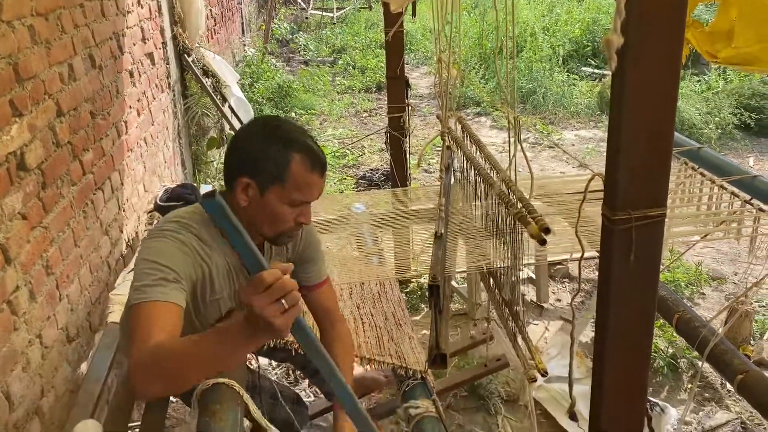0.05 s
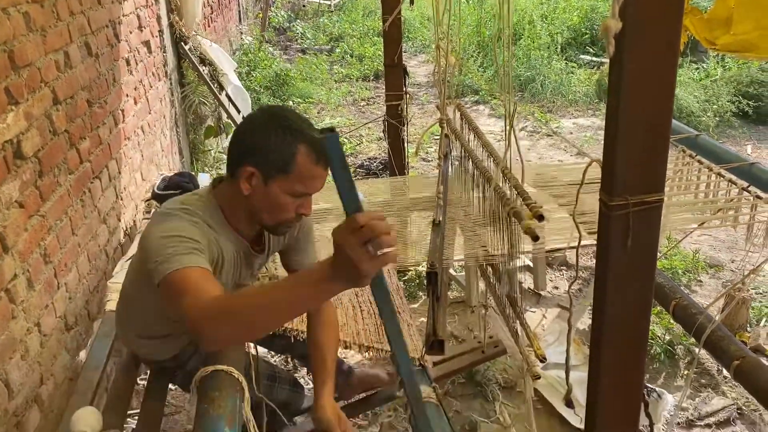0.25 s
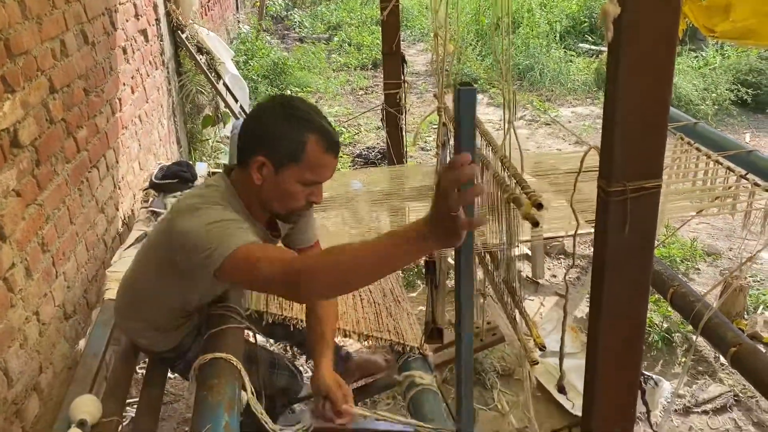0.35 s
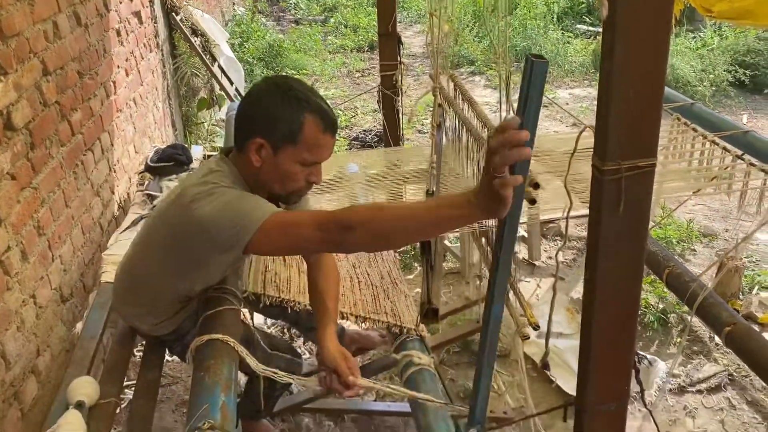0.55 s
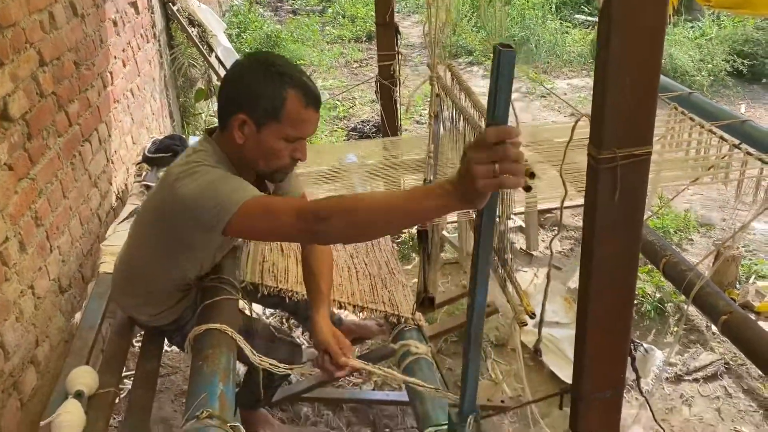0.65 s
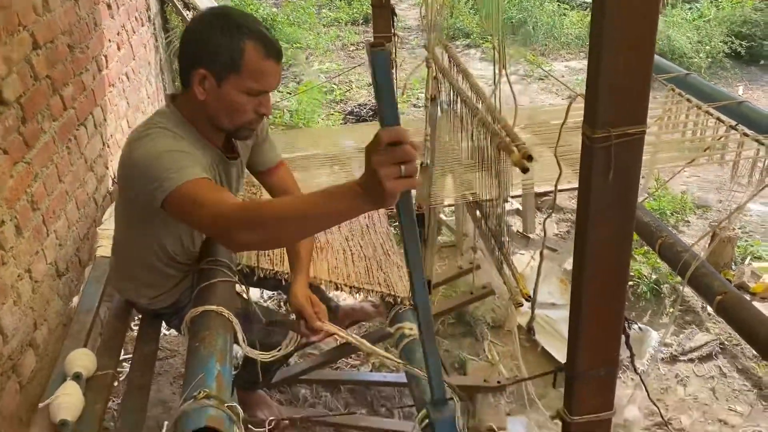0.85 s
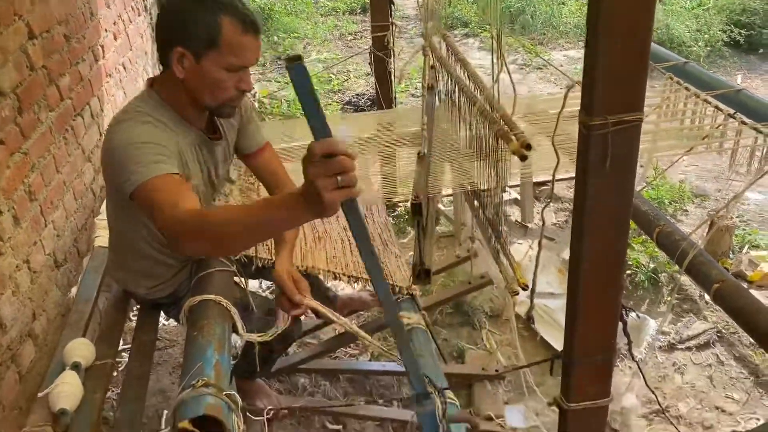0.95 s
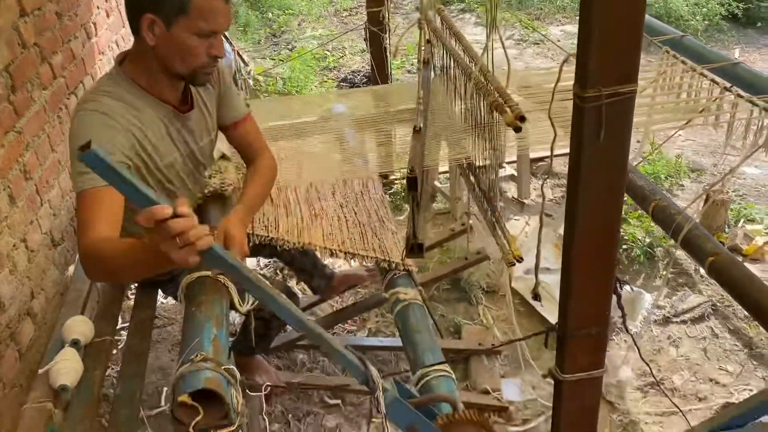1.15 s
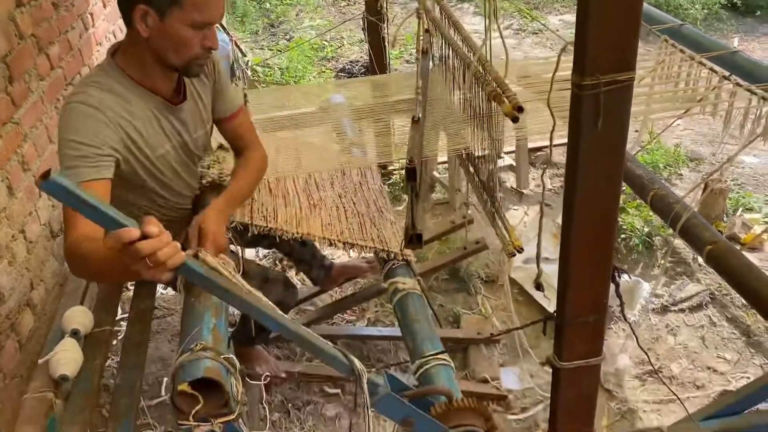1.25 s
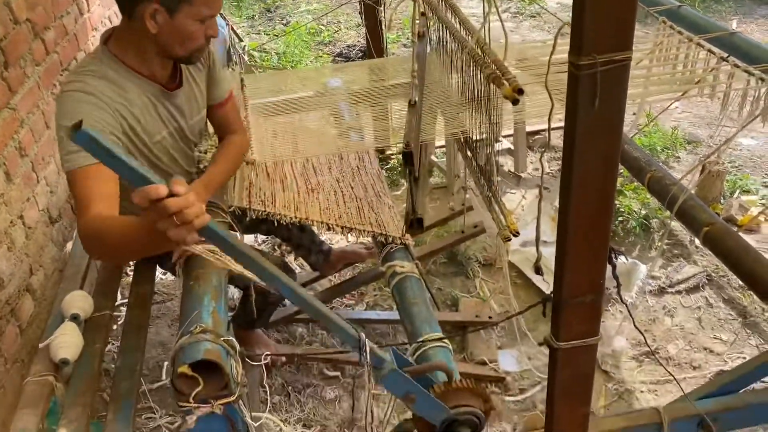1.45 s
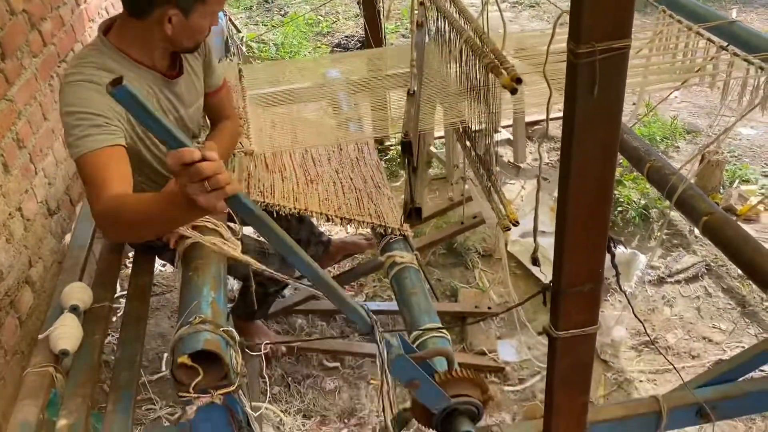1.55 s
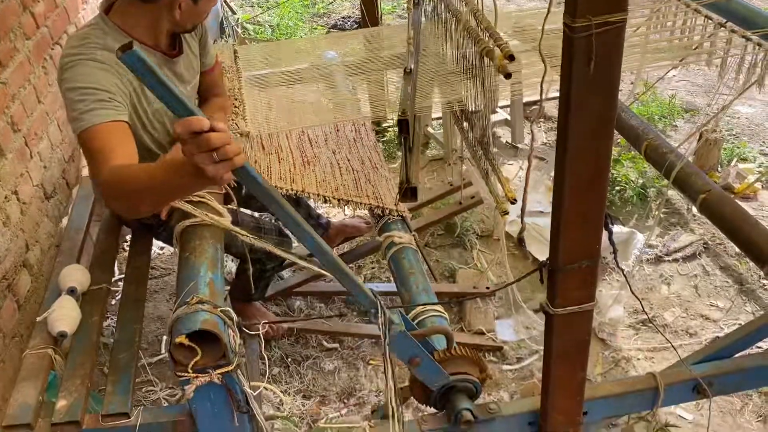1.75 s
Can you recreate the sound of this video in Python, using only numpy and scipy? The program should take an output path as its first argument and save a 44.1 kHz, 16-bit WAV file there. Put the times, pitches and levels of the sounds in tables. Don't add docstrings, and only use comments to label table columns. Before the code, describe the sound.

Metal lever clanking on a loom's ratchet roller, close and outdoors. After faint ticks, seven bright, ringing tube knocks bounce from 0.2 to 0.52 s, quickening, then are damped by hand at 0.56. A loud crunching clatter seats it at 0.78-0.92 with timber rumble. Sharp pawl clacks follow at 1.02, 1.11 and 1.24, a hard clank at 1.44, then small knocks, a tiny squeak and quiet yard air.

```python
import sys
import numpy as np
from scipy import signal
from scipy.fft import rfft, irfft, next_fast_len
from scipy.io import wavfile

SR = 44100
rng = np.random.default_rng(int(sys.argv[2]) if len(sys.argv) > 2 else 0)


def int16_out(signal):
    q = np.round(np.clip(np.atleast_2d(signal).T, -1, 1) * 32767)
    wavfile.write(sys.argv[1], SR, q.astype(np.int16))


def level_to_linear(level):
    exponent = np.asarray(level, float) / 20
    return 10 ** exponent


N = 79380

# frequency [Hz], level [dB per Hz].
AIR_SPECTRUM = [(15, -43), (25, 0.5), (60, -3.5), (251, -17), (329, -5.5), (387, -19), (2020, -21),
                (16300, -43.5)]
AIR_DB, AIR_FADE_DB_PER_S = -28.5, 2.4
# frequency [Hz], width [Hz], level [dB], change [dB per s].
DRONES = [(316, 27, -57.5, -10), (1217.5, 46, -59, -3), (61.4, 15, -61.5, 5)]
# delay [s], left level [dB], right level [dB].
ECHOES = [
    (.004, -38.5, -37.5),
    (.0071, -10.5, -6.5),
]

SQUEAK_S, SQUEAK_LENGTH_S, SQUEAK_HZ, SQUEAK_RISE_HZ = 1.545, 0.1, 5430, 130
SQUEAK_DB, SQUEAK_OCTAVE_DB, SQUEAK_RIGHT = -53, -51, -0.4

# time [s], level [dB].
STRAIN = [(.78, -74), (.82, -31.5), (.94, -38.5), (1.0, -45), (1.27, -50), (1.36, -45), (1.44, -47.5),
          (1.489, -32), (1.57, -47), (1.64, -54)]
# frequency [Hz], level [dB per Hz].
FRAME_SPECTRUM = [(30, -27), (70, 0), (250, -12), (500, -13), (1500, -9.5), (8000, -43)]
# frequency [Hz], width [Hz], level [dB].
FRAME_MODES = [(75.8, 12, 16), (135, 16, 6), (204, 14, -20), (246.6, 11, 21), (485, 31, 10)]
CREAKS_PER_S, CREAK_DB, FRAME_BODY_DB = 130, -13.5, -13
# start [s], frequency [Hz], level [dB], t60 [s].
THUMPS = [(.812, 129, -30, 0.19), (.84, 205, -31, 0.18), (0.849, 72.5, -30, 0.14), (.9, 80, -31, 0.26),
          (.905, 147, -38.5, 0.31), (.912, 263, -32.5, 0.24), (1.024, 257, -35, 0.14),
          (1.113, 273, -35.5, 0.17), (1.12, 148, -42, 0.27), (1.158, 63.5, -38, 0.16),
          (1.225, 65.6, -40, 0.33), (1.239, 256.5, -39.5, 0.28), (1.431, 113, -32, 0.15),
          (1.476, 203, -34, 0.21), (1.499, 89.6, -41, .25), (1.48, 506, -42.5, 0.25),
          (1.671, 59.9, -37, 0.3)]
THUMP_RISE_CYCLES, THUMP_FLICKER_DB = 1.83, 3.0

# frequency [Hz], level [dB], t60 [s].
SLAT = [(2030, 0, .04), (970, -5, .09)]
TICK_S, TICK_DB = 0.0395, -42

# start [s], peak [dB], brightness [dB per octave], ring length [factor], crack [dB].
CLACKS = [(0.101, -44.5, 6.5, 2.7, 1), (.709, -48.5, 6, .8, -4), (0.776, -15.5, -6.5, 1.2, -4),
          (0.785, -14.5, -3.5, 0.77, 1.5), (0.788, -6.5, 4.5, 0.75, -5), (0.7949, -10.5, -3, 0.5, 7),
          (0.806, -9.5, 1, 0.9, -1), (.822, -16, -5.5, 1.6, -9), (0.839, -13, -2.5, 1.8, -3),
          (0.867, -15, -1, 0.8, -1), (0.901, -9, -5, 0.77, -2), (0.912, -10.5, -3, 0.8, -8),
          (1.022, -6.5, 1.74, 1.05, 4.5), (1.112, -6, -0.5, 1.06, 0.5), (1.237, -8, -0.63, 1.07, -2),
          (1.382, -24.5, -4.5, 1.1, 4), (1.42, -25.5, -2.5, 0.53, -4), (1.444, -5.5, 0.76, 0.74, 2.5),
          (1.523, -22, -4, 1.2, -7), (1.573, -31.5, 0.5, 1, 0), (1.6, -44.5, 6, 1.5, -1)]
# frequency [Hz], level [dB per Hz].
CLACK_SPECTRUM = [(90, -33), (300, -16.5), (1500, -7.5), (4490, -10), (7600, -14), (10600, -25.5),
                  (15100, -25.5), (16500, -26)]
# frequency [Hz], t60 [s].
CLACK_T60 = [(200, 0.27), (1000, 0.25), (4000, 0.16), (10000, 0.1), (16000, 0.06)]
CRACK_DB, CRACK_T60_S = 1, 0.017
BODY_T60_S, BODY_DB = 0.031, -3.5

# start [s], peak [dB], brightness [dB per octave], spring [dB].
TEETH = [
    (1.024, -18.5, 1, -17.5),
    (1.113, -20, 1.6, -13.5),
    (1.24, -21.5, 1.8, -38),
]
PAWL_HZ = [878, 1356, 1682, 2185, 2575, 3750, 4372, 5700, 6570, 7345, 14350, 14800]
# level [dB], t60 [s].
PAWL = [(-15.5, 0.22), (-21, 0.52), (-1, 0.054), (-1.5, 0.038), (-20, 0.53), (-14.5, 0.22), (-6, 0.12),
        (-19.5, 0.17), (-38, 0.083), (-35, 0.042), (-25, 0.11), (-14, 0.096)]
# frequency [Hz], level [dB], t60 [s].
SPRING = [(10860, 2, .14), (11300, -15, .07), (8830, 1, .15)]

# start [s], frequency [Hz], level [dB].
PINGS = [
    (.804, 5400, -22),
    (.912, 5100, -27),
    (.841, 4500, -29),
    (.841, 3600, -30),
    (.913, 7200, -31),
    (.868, 4600, -32),
]
PING_T60_S = 0.051

# start [s], peak [dB], high ring [dB], rattle [dB].
KNOCKS = [
    (0.2007, -13, -3.5, -4.5),
    (0.277, -11.5, -1.5, -3),
    (0.3452, -16, -6.5, -8),
    (0.407, -11.5, -3, -3.5),
    (0.4616, -14.5, -4, -6.5),
    (0.4985, -18.5, -5.5, -9),
    (0.5158, -15.5, -10.5, -11),
]
# frequency [Hz], level [dB per Hz].
KNOCK_SPECTRUM = [(120, -22.5), (350, -13.5), (1140, -8.5), (4000, -9.5), (6600, -13), (8800, -52),
                  (11000, -22), (16500, -48)]
TUBE_LOW_HZ = [665, 1149, 1218, 1268, 1296, 1545, 1733, 1790, 2592]
# level [dB], t60 [s].
TUBE_LOW = [(-21.5, 0.11), (-10, 0.19), (-22.5, 0.37), (-19.5, 0.56), (-17.5, 0.67), (-25.5, 0.43),
            (-22.5, 0.27), (-13, 0.056), (-28.5, 0.34)]
TUBE_HIGH_HZ = [4210, 5340, 7117, 9892, 10225, 11103, 12202, 14383]
# level [dB], t60 [s].
TUBE_HIGH = [(-21, 0.11), (-23.5, .2), (-2, 0.38), (-28.5, 0.26), (-24, 0.079), (-22.5, 0.18),
             (-18.5, 0.19), (-31, 0.272)]
STRONG_WALL_HZ, SHAKE_DB = 7117, 1.5
GRIP_S, GRIP_DB_PER_S = 0.556, 452
LINGER_DB, WALL_LINGER_DB, LINGER_DB_PER_S = 1, -22, 146
# start [s], peak [dB].
HELD = [
    (0.1782, -44),
    (1.4054, -37),
    (1.5248, -26),
    (1.5726, -25.5),
]
# frequency [Hz], level [dB], t60 [s].
HELD_LOW = [(1150, -9, 0.09), (1228, -15, 0.15), (1248, -8, 0.5), (1307, -12, 0.12), (1385, -20, .1),
            (1715, -18, .08), (5480, -30, .3)]
# start [s], peak [dB].
SEATS = [
    (0.7904, -14),
    (0.8031, -14.5),
    (0.8183, -23),
]
# frequency [Hz], level [dB], t60 [s].
SEATED = [(876, -14, 0.37), (1168, -5, .08), (1235, -6.5, 0.22), (1295, -7.5, 0.093), (1590, -11.5, 0.068),
          (1750, -11.5, 0.066), (1966, -11, 0.064), (2536, -16, 0.13), (4160, -21, 0.046),
          (7130, -5, 0.038)]
# frequency [Hz], level [dB], t60 [s].
STOP = [(883, -2, 0.081), (1003, -5, 0.12), (1660, -3, 0.12), (1826, -1.5, 0.055), (2500, -27, 0.089),
        (3450, -2.5, 0.059), (7330, 3, 0.03)]
STOP_S, STOP_DB = 1.4437, -24

# frequency [Hz], left-right likeness [0 to 1].
LIKENESS = [(60, 0.92), (250, 0.91), (700, 0.44), (2500, 0.53), (5000, 0.54), (8000, 0.57)]
# frequency [Hz], lag of the left [half turns].
LAG = [(20, 0), (7400, .06), (8500, .97), (9500, 1.03), (10500, 1.95), (11700, 2.05), (12700, 2.96),
       (13700, 3.04), (14600, 3.95), (15200, 4.05), (16500, 4.9)]
LEFT_DB, CUTOFF_HZ = 0.4, 16600
ALIKE_ABOVE_HZ, TOP_HZ, TOP_DB = 7900, 15300, -3


def rms_one(x):
    return x / np.sqrt(np.mean(x ** 2) + 1e-20)


def at_hz(points, hz):
    table_hz, value = np.transpose(points)
    return np.interp(np.log(hz), np.log(table_hz), value)


def drift(rate):
    r = np.exp(-80 * np.pi * rate / SR)
    slow = signal.lfilter([1], [1, -2 * r, r * r], rng.standard_normal(N // 40 + 2002))[2000:]
    return np.interp(np.arange(N) / 40, np.arange(len(slow)), rms_one(slow))


def band_pass(x, low_hz, high_hz):
    return signal.sosfilt(signal.butter(2, [low_hz, high_hz], "band", fs=SR, output="sos"), x)


def resonance(x, hz, width_hz):
    r = np.exp(-np.pi * width_hz / SR)
    poles = [1, -2 * r * np.cos(2 * np.pi * hz / SR), r * r]
    return signal.lfilter([(1 - r * r) / 2, 0, (r * r - 1) / 2], poles, x)


def bands():
    edges = 27 * 2 ** (np.arange(29) / 3)
    white = rng.standard_normal((2, 2, N))
    for k, (low, high) in enumerate(zip(edges, edges[1:])):
        mid, side = band_pass(white[k % 2], low, high)
        hz = np.sqrt(low * high)
        alike = np.clip(at_hz(LIKENESS, hz), 0, 1)
        yield hz, np.sqrt(1 + alike) * mid + np.sqrt(1 - alike) * side * [[1], [-1]]


def dying(s, db, t60, rise_s):
    s, db, t60 = (np.reshape(v, (-1, 1)) for v in (s, db, t60))
    age = np.clip(np.arange(N) / SR - s, 0, None)
    power = np.exp((db - 60 * age / t60) * np.log(10) / 10, dtype=np.float32)
    return np.sum(power * np.clip(age / rise_s, 0, 1) ** 2, axis=0)


def struck(s, db, modes, spread_db, stop_s, tilt_db=0):
    hz, level_db, t60 = np.transpose(modes)[:, :, None]
    out = np.zeros(N)
    luck = rng.standard_normal((len(s), 2, len(modes), 1))
    tilts = tilt_db + 0 * np.array(s)
    for start, end, peak_db, tilt, (strength, phase) in zip(s, [*s[1:], 9], db, tilts, luck):
        i = int(start * SR)
        length = min(N - i, SR // 2, int((end - start + 8 * stop_s) * SR))
        t = np.arange(length) / SR
        mode_db = peak_db + level_db + tilt * np.log2(hz / 3000) + spread_db * strength
        ring = level_to_linear(mode_db - 60 * t / t60) * np.sin(2 * np.pi * hz * t + phase)
        onset = 1 - np.exp(-t / 0.00026)
        stilled = np.exp(-np.clip(t - end + start, 0, None) / stop_s)
        out[i:i + length] += ring.sum(axis=0) * onset * stilled
    return out


def open_air(hz, noise, gust):
    level_db = AIR_DB - AIR_FADE_DB_PER_S * np.arange(N) / SR + at_hz(AIR_SPECTRUM, hz)
    return noise * level_to_linear(level_db + 0.54 * gust + 0.48 * drift(13))


def yard():
    t, out = np.arange(N) / SR, 0
    for hz, width_hz, db, slope_db in DRONES:
        gain = level_to_linear(db + slope_db * t + 0.55 * drift(3.7))
        tone = resonance(rng.standard_normal(N), hz, width_hz)
        out = out + gain * rms_one(resonance(tone, hz, width_hz))
    return out


def shed(x):
    thin, out = band_pass(x, 400, 4000), 0
    for k, (s, left_db, right_db) in enumerate(ECHOES):
        late = np.pad(thin, (int(s * SR), 0))[:N]
        out = out + level_to_linear([[left_db], [right_db]]) * [[1], [(-1) ** k]] * late
    return out


def squeak():
    u = np.clip((np.arange(N) / SR - SQUEAK_S) / SQUEAK_LENGTH_S, 0, 1)
    hz = SQUEAK_HZ + SQUEAK_RISE_HZ * np.sqrt(u) + 40 * drift(150)
    phase = 2 * np.pi * np.cumsum(hz) / SR
    swell = np.sin(np.pi * u) * level_to_linear(3 * drift(80))
    tone = level_to_linear(SQUEAK_DB) * np.sin(phase) * [[1], [SQUEAK_RIGHT]]
    octave = level_to_linear(SQUEAK_OCTAVE_DB) * swell * np.sin(2 * phase)
    return swell * (tone + octave)


def strain():
    s, db = np.transpose(STRAIN)
    return level_to_linear(np.interp(np.arange(N) / SR, s, db, left=-99))


def frame():
    slips = (rng.random(N) < CREAKS_PER_S / SR) * level_to_linear(np.minimum(rng.exponential(1, N), 4))
    slips = slips * rng.choice([-1, 1], N)
    drive = rms_one(slips) + 0.34 * rng.standard_normal(N)
    timber = sum(level_to_linear(db) * resonance(drive, hz, w) * np.sqrt(100 / w) for hz, w, db in FRAME_MODES)
    grain = band_pass(drive, 500, 4000)
    return strain() * (level_to_linear(FRAME_BODY_DB) * rms_one(timber) + level_to_linear(CREAK_DB) * rms_one(grain))


def thumps():
    s, hz, db, t60 = np.transpose(THUMPS)[:, :, None]
    t = np.clip(np.arange(N) / SR - s, 0, None)
    flicker_db = THUMP_FLICKER_DB * np.array([drift(16) for _ in THUMPS])
    swell = 1 - np.exp(-t * hz / THUMP_RISE_CYCLES)
    beams = level_to_linear(db + 2.0 - 60 * t / t60 + flicker_db) * swell * np.sin(2 * np.pi * hz * t)
    return np.sum(beams, axis=0)


def slat():
    return struck([TICK_S], [TICK_DB], SLAT, spread_db=0, stop_s=1)


def grip(linger_db=LINGER_DB):
    t = np.clip(np.arange(N) / SR - GRIP_S, 0, None)
    return np.maximum(level_to_linear(-GRIP_DB_PER_S * t), level_to_linear(linger_db - LINGER_DB_PER_S * t))


def roller_body(x):
    t = np.arange(SR // 10) / SR
    ring = rng.standard_normal(len(t)) * level_to_linear(-60 * t / BODY_T60_S)
    ring = level_to_linear(BODY_DB) * ring / np.sqrt(np.sum(ring ** 2))
    ring[0] = 1
    ring = ring / np.sqrt(np.sum(ring ** 2))
    return signal.fftconvolve(x, ring[None], axes=1)[:, :N]


def contact_power(hz):
    s, db, tilt_db, length, crack_db = np.transpose(CLACKS)
    knock_s, knock_db, _, rattle_db = np.transpose(KNOCKS)
    t60 = at_hz(CLACK_T60, hz)
    clack_db = db + at_hz(CLACK_SPECTRUM, hz) + tilt_db * np.log2(hz / 2000)
    clack = dying(s, clack_db - 2.5, t60 * np.clip(length, 0.1, 4), rise_s=0.0029 + 4.5 / hz)
    crack = dying(s, clack_db + CRACK_DB + crack_db, CRACK_T60_S + 0 * s, rise_s=0.0016)
    socket_db = knock_db + rattle_db + at_hz(KNOCK_SPECTRUM, hz)
    rattle = dying(knock_s, socket_db, 1.63 * t60 + 0 * knock_s, rise_s=0.00029 + 2.2 / hz)
    return clack + crack + rattle * grip() ** 2


def dense():
    near, air, pull, gust = 0, 0, strain(), drift(12.7)
    chatter = level_to_linear(2.8 * drift(100))
    for hz, noise in bands():
        contact = contact_power(hz) * chatter * level_to_linear(2.7 * drift(36))
        rumble = (pull * level_to_linear(15 + at_hz(FRAME_SPECTRUM, hz) + 2.8 * drift(26))) ** 2
        near = near + np.sqrt(contact + rumble) * noise
        air = air + open_air(hz, noise[:, ::-1], gust)
    return roller_body(near) + air


def pawl():
    s, db, tilt_db, spring_db = np.transpose(TEETH)
    modes = np.column_stack([PAWL_HZ, PAWL])
    teeth = struck(s, db - 2.0, modes, spread_db=-1.5, stop_s=0.003, tilt_db=tilt_db)
    return teeth + struck(s, db + spring_db, SPRING, spread_db=0, stop_s=0.003)


def pings():
    return sum(struck([s], [db], [(hz, 0, PING_T60_S)], spread_db=-1.5, stop_s=1) for s, hz, db in PINGS)


def free_tube():
    s, db, high_db, _ = np.transpose(KNOCKS)
    bending = struck(s, db - 1.5, np.column_stack([TUBE_LOW_HZ, TUBE_LOW]), spread_db=1.5, stop_s=0.0023)
    wall = 0
    for hz, mode in zip(TUBE_HIGH_HZ, TUBE_HIGH):
        shake_db = SHAKE_DB * (hz != STRONG_WALL_HZ)
        ring = struck(s, db + high_db + 1.5, [(hz, *mode)], spread_db=shake_db, stop_s=0.0016)
        wall = wall + ring * level_to_linear(2.3 * drift(66) + shake_db * drift(130))
    return bending * grip() + wall * grip(WALL_LINGER_DB)


def lever():
    free = free_tube()
    held = struck(*np.transpose(HELD), HELD_LOW, spread_db=2.5, stop_s=0.002) * level_to_linear(drift(25))
    seated = struck(*np.transpose(SEATS), SEATED, spread_db=2.5, stop_s=0.0013) + pings()
    stop = struck([STOP_S], [STOP_DB], STOP, spread_db=0, stop_s=1)
    return free + held + seated + stop


def scene():
    near = lever() + pawl() + slat() + frame() + thumps()
    return near + shed(near) + dense() + yard() + squeak()


def band_limit(x):
    return signal.sosfilt(signal.butter(12, 16480, fs=SR, output="sos"), x)


def record(dry):
    size = next_fast_len(N + 4096)
    hz = np.fft.rfftfreq(size, 1 / SR) + 1
    spectrum = rfft(dry, size)
    treble = spectrum[0] * level_to_linear(TOP_DB * (hz > TOP_HZ))
    below = spectrum * level_to_linear([[LEFT_DB], [-LEFT_DB]])
    ports = np.where(hz > ALIKE_ABOVE_HZ, treble, below)
    turn = np.exp(-0.5j * np.pi * at_hz(LAG, hz) * [[1], [-1]])
    x = irfft(ports * turn, size)[:, :N]
    x = signal.sosfilt(signal.butter(2, 50, "high", fs=SR, output="sos"), x)
    x = signal.sosfilt(signal.cheby2(12, 60, CUTOFF_HZ, fs=SR, output="sos"), x)
    return band_limit(x)


dry = scene()
out = record(dry)
int16_out(out)
```